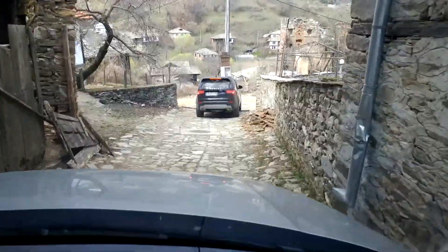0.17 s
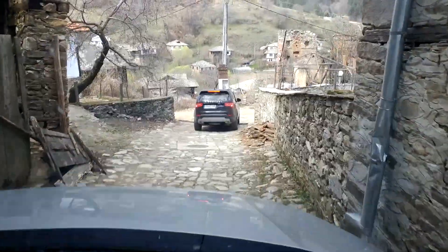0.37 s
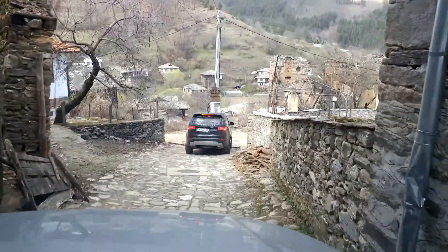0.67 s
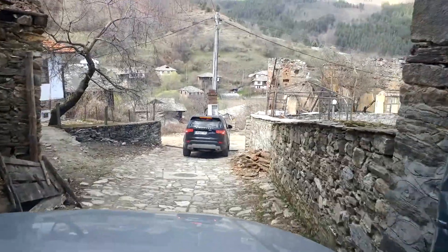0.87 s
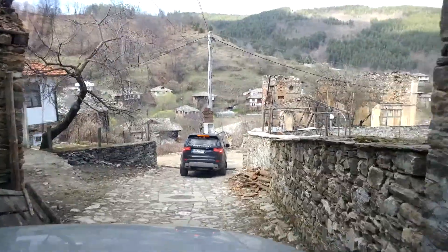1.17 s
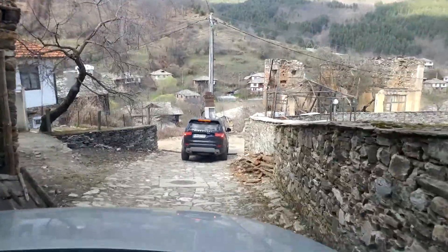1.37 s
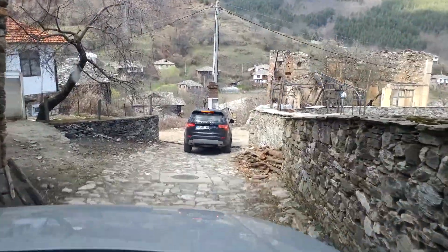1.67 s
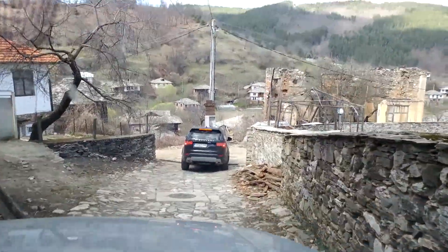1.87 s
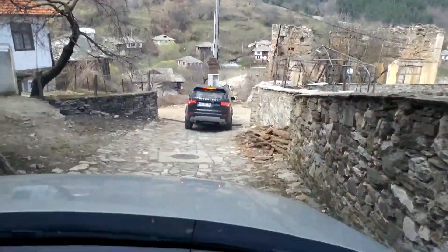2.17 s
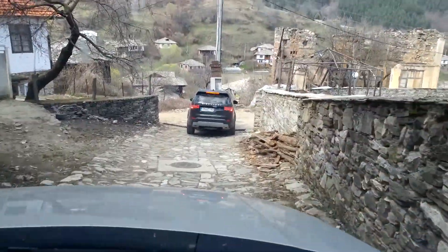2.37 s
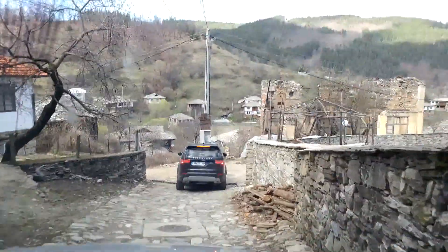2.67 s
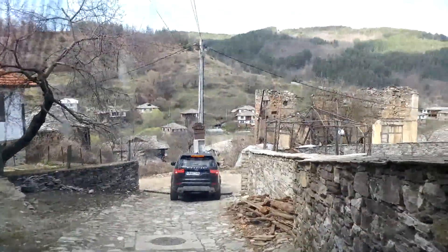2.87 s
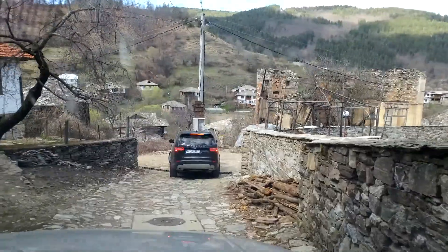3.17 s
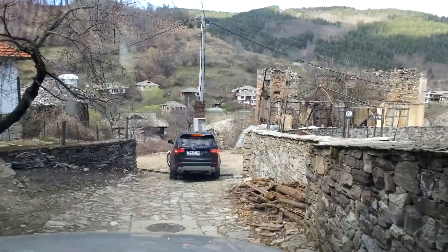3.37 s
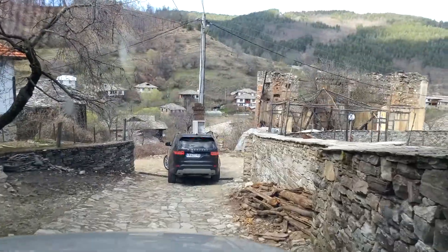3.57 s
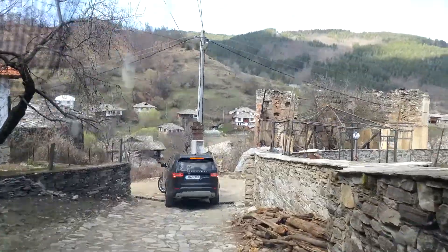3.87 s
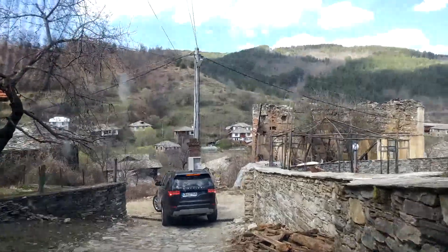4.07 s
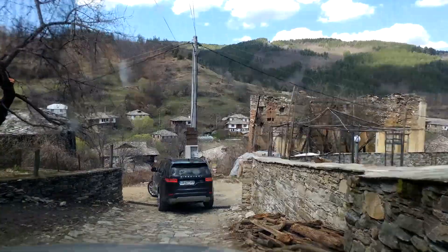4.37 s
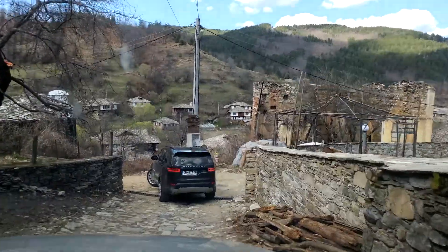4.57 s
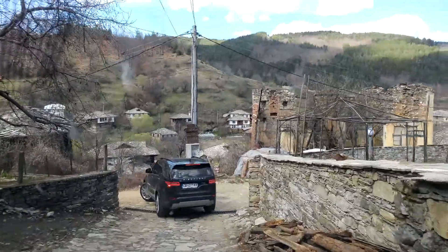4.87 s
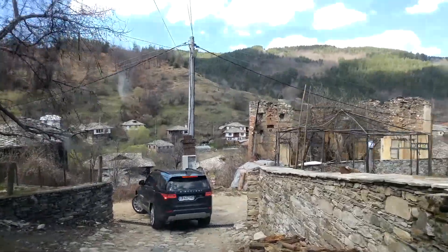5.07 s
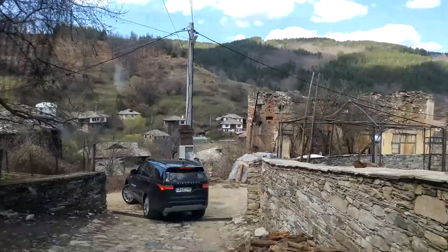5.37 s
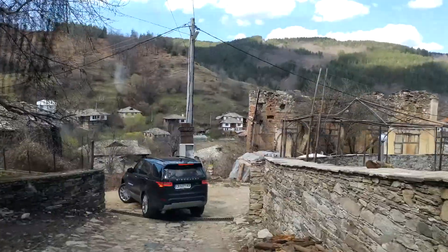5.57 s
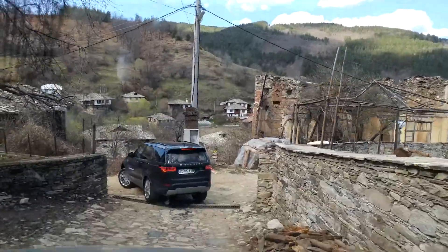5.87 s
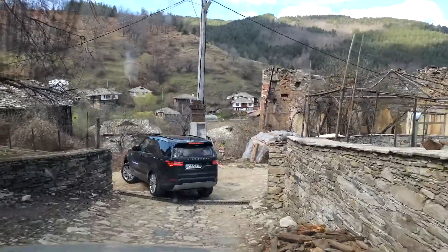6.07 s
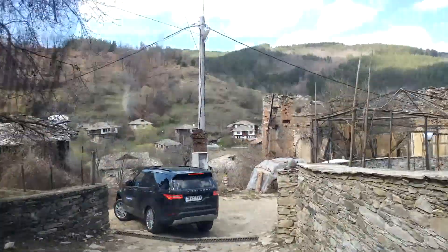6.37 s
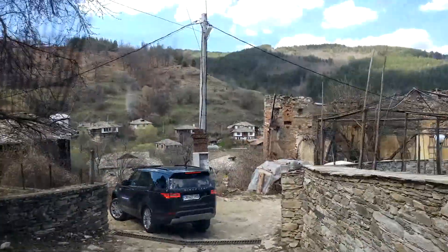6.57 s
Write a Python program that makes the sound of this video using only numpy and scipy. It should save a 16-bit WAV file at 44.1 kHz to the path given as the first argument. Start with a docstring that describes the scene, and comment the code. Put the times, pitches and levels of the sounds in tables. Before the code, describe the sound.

A car rolls slowly over cobblestones, heard from inside: low uneven rumble, steady engine hum and light clicks of plastic trim.

```python
"""A low, uneven booming fills the cabin of a car rolling slowly over cobblestones.
Stones strike the tyres and ring the cabin modes; hard ones knock through the suspension.
Under this run an engine hum and a blower roar. Plastic trim hisses, rattles and clicks,
and a brake squeaks faintly by stick-slip. Heard through a microphone pair near the windscreen."""
import sys
import numpy as np
from scipy import signal
from scipy.fft import rfft, irfft, next_fast_len
from scipy.io import wavfile
from scipy.ndimage import uniform_filter1d

SR = 44100
rng = np.random.default_rng(int(sys.argv[2]) if len(sys.argv) > 2 else 0)


def unload_audio(sound):
    """Save the sound as a 16-bit wav file, at the path given as the first command line argument."""
    columns = np.transpose(np.atleast_2d(sound))
    # keep every value between -1 and 1, then stretch to whole-number steps
    steps = np.round(np.clip(columns, -1, 1) * 32767)
    wavfile.write(sys.argv[1], SR, steps.astype(np.int16))


N = 296954

# Stereo likeness of cabin noise. Each row: frequency in Hz, left-right correlation.
COHERENCE = [(60, 0.46), (200, 1), (420, 0.85), (690, 0.49), (1130, 0.065), (3000, 0.06), (13000, 0.029)]
# Trim hiss. Each row: frequency in Hz, relative density in dB.
HISS_SPECTRUM = [(1200, 11), (2500, 4.5), (4500, 0.5), (6500, 0), (14000, 8)]
# Each row: time in seconds, hiss level in dB.
HISS_LEVEL = [(0.0, -54), (0.16, -66), (0.35, -68.5), (0.75, -64), (0.92, -67.5), (1.3, -62), (1.95, -65.5),
              (2.5, -66.5), (2.8, -64), (3.25, -66.5), (3.7, -70.5), (3.95, -64), (4.45, -68), (4.65, -64),
              (4.9, -67.5), (5.1, -62), (5.5, -68), (6.0, -65.5), (6.7, -62)]
# Engine hum. Each row: time in seconds, pitch in Hz, level in dB.
ENGINE_HUM = [(0.05, 161.4, -45), (1.0, 162.2, -46.5), (2.79, 168.5, -46.5), (3.22, 161.1, -45.5),
              (3.9, 166.7, -46.5), (4.33, 163.5, -45.5), (4.9, 167.9, -47.5), (6.4, 165.8, -44.5),
              (6.6, 161, -47.5)]
# Blower and engine roar. Each row: frequency in Hz, relative density in dB.
ROAR_SPECTRUM = [(90, -25.5), (130, -25.5), (200, -11), (260, -7), (380, -12), (560, -4.5), (800, -13.5),
                 (1000, -25.5), (1400, -32), (1900, -39), (2500, -51), (3200, -80)]
# Each row: time in seconds, base roar level in dB.
ROAR_LEVEL = [(0.02, -45), (0.72, -44), (0.92, -44.5), (2.3, -44.5), (4.54, -44.5), (4.6, -41.5),
              (4.7, -46), (5.1, -44), (5.3, -45.5), (6.5, -43.5), (6.72, -43.5)]
# Duct and panel resonances. Each row: frequency in Hz, width in Hz, level in dB.
DUCT_MODES = [(190, 14, -55), (530, 50, -56), (780, 40, -63), (1265, 19, -70.5), (1820, 17, -77)]
# Brake squeak, one list per note. Each row: time in seconds, pitch in Hz, level in dB.
BRAKE_NOTES = [
    [(1.288, 3760, -76), (1.325, 3620, -73), (1.378, 3700, -71), (1.42, 3860, -79), (1.57, 3780, -80),
     (1.615, 3750, -70), (1.66, 3830, -86), (1.84, 3760, -85)],
    [(1.685, 4350, -77), (1.74, 4560, -78), (1.83, 4530, -82), (1.885, 4430, -75), (1.92, 4450, -77),
     (1.965, 4350, -86)],
]
# Close ticks. Each row: start in seconds, gain in dB, left minus right in dB.
CLOSE_TICKS = [(2.352, -62, 3), (3.054, -61, -2), (3.095, -65, 0), (3.2, -64, 0), (5.32, -62, -6),
               (5.523, -61, -5), (5.625, -64, -2), (5.7173, -61, 9), (6.1066, -61, -9), (6.444, -57, -8)]
# Trim clicks. Each row: start in seconds, click length in seconds, knock gain in dB,
# snap gain in dB, snap slope in dB per octave, ring frequency in Hz, ring gain as a factor.
TRIM_CLICKS = [(0.032, 0.0098, -6.5, -34.5, -2, 4600, 1.4), (0.05, 0.1, -30, -55, 18, 10700, 2.7),
               (0.176, 0.062, -2.5, -45, -20, 2360, 0.61), (0.413, 0.021, -15, -39, 6, 2370, 11),
               (1.108, 0.05, -36, -37, 5, 7750, 0.84), (1.226, 0.019, -24, -41, -5, 6100, 2),
               (1.393, 0.015, -5, -37, -1, 1400, 2.1), (1.507, 0.023, -15, -42, -19, 1900, 3),
               (1.728, 0.032, -21, -29.5, 1.5, 3100, 1.4), (2.073, 0.019, -34, -40, -1, 6340, 2.2),
               (2.469, 0.087, -15, -39, 7, 6240, 1), (3.568, 0.02, -15, -36.5, -15, 3700, 3.4),
               (3.87, 0.023, -22, -35, 0, 5440, 7.8), (3.878, 0.025, -6, -29, -2, 2960, 9.8),
               (3.948, 0.065, -7.5, -39, 4.5, 7150, 2.6), (4.592, 0.031, -13, -34, 3, 3960, 1.2),
               (5.101, 0.032, -9, -40.5, 1, 3710, 3.6), (5.144, 0.035, -26, -39.5, 1.5, 10500, 2),
               (5.373, 0.024, -23, -39.5, 2, 5570, 4.6), (5.867, 0.014, -23, -38.5, 2, 6170, 5.1),
               (5.887, 0.047, -16, -39, -2, 6380, 3.3), (6.163, 0.022, -6, -30, 1.5, 4020, 3),
               (6.244, 0.013, -19, -46, -5, 4050, 3.75), (6.333, 0.056, -34, -33, -11, 3330, 1.26),
               (6.464, 0.031, -8, -30, 2, 5190, 2)]
# Hollow knock of the trim. Each row: frequency in Hz, gain in dB.
TRIM_BODY = [(600, -29), (1000, -2.5), (1400, -12.5), (2400, -26.5), (4000, -71)]
# Plastic trim modes. Each row: frequency in Hz, gain as a factor.
TRIM_MODES = [(1020, 2.43), (1400, 0.57), (2980, 0.42), (3640, 1.2), (4000, 1.67), (4700, 0.63),
              (5900, 2.1), (7400, 1.5)]
# Hard stones. Each row: start in seconds, gain in dB, ring frequency in Hz, T60 in seconds.
STONE_KNOCKS = [(0.72, -30.5, 513, 0.12), (2.495, -36.5, 328, 0.15), (2.709, -39, 448, 0.11),
                (4.051, -25.5, 138, 0.1), (4.595, -19.5, 179, 0.054), (4.749, -35, 567, 0.11),
                (5.899, -23.5, 143.3, 0.15), (6.444, -34, 563, 0.052)]
# Cabin and body modes, two groups. Each row: frequency in Hz, width in Hz, relative level in dB.
LOW_BOOM_MODES = [(40, 10, -2), (49, 12, 0), (63, 13, -1)]
HIGH_BOOM_MODES = [(80, 13, 1), (99, 14, 0), (116, 11, -11)]
# Run of cobbles. Each row: time in seconds, low boom in dB, high boom in dB.
COBBLE_LEVELS = [(0, -46.5, -40), (1.1, -37.5, -62.5), (1.7, -35.5, -34.5), (2.2, -36.5, -39.5),
                 (3.1, -39.5, -43), (3.6, -32, -41), (4.35, -53, -39.5), (4.8, -33.5, -37.5),
                 (5.6, -31, -34), (6.15, -40.5, -41.5), (6.4, -31.5, -34), (6.73, -30.5, -51)]
# Larger stones and dips. Each row: centre in seconds, half-length in seconds,
# low boom in dB, high boom in dB.
ROAD_BUMPS = [(0.01, 0.056, -27.5, -33.5), (0.176, 0.1, -62, -31.5), (0.471, 0.53, -35.5, -39),
              (0.62, 0.16, -28.5, -49), (0.741, 0.22, -41, -29.5), (0.959, 0.084, -34, -30.5),
              (1.224, 0.19, -33.5, -36), (1.383, 0.1, -37.5, -35.5), (2.441, 0.026, -55, -27.5),
              (2.636, 0.18, -28, -30), (2.978, 0.15, -28, -29), (3.276, 0.26, -32, -38.5),
              (3.762, 0.13, -50, -33.5), (3.947, 0.27, -29.5, -43), (4.033, 0.077, -39, -29),
              (4.282, 0.14, -35, -37.5), (4.51, 0.11, -30.5, -54), (4.615, 0.074, -28.5, -23),
              (4.736, 0.16, -26.5, -31.5), (4.915, 0.037, -45, -23), (5.06, 0.22, -31, -33.5),
              (5.125, 0.064, -40, -28.5), (5.915, 0.18, -35, -33), (6.05, 0.11, -29.5, -48),
              (6.278, 0.14, -30.5, -35), (6.483, 0.04, -28, -27), (6.598, 0.13, -41, -29.5)]
# Capsule response. Each row: frequency in Hz, gain in dB.
MIC_RESPONSE = [(20, -19.5), (36, 0.5), (7000, 1), (8300, -5), (9100, -13), (9700, -0.5), (10500, -3),
                (12000, -10.5), (14000, -15.5)]
# Microphone port imbalance. Each row: frequency in Hz, left minus right in dB.
PORT_BALANCE = [(60, 0), (180, -3), (310, 0.5), (500, -1.5), (4000, -1.5), (7500, -2), (9000, 6),
                (10000, 13.5), (11500, 5), (13500, 1.5)]
# One small pop: start in seconds, height in dB, left minus right in dB.
POP = (4.321, -39.5, 10.5)

PORT_LAG_S, BAND_LIMIT_HZ = .00014, 13550
STONES_PER_S, RATTLES_PER_S, CLICK_GRAINS_PER_S = 150, 25, 4000


def gain_of(db):
    return 10 ** (np.asarray(db) / 20)


def panned_gain(db, pan_db):
    return gain_of(db + np.array([[.5], [-.5]]) * pan_db)


def unit_rms(x):
    return x / np.sqrt(np.mean(x ** 2) + 1e-20)


def level_out(x):
    """Holds the slow level near RMS 1; keeps the quick grain."""
    slow_power = uniform_filter1d((x ** 2).mean(0), size=5000)
    return unit_rms(x / np.sqrt(slow_power + 0.021 * np.mean(x ** 2)))


def at_hz(table, hz):
    """Spectrum table, interpolated over log frequency."""
    table_hz, value = np.transpose(table)
    return np.interp(np.log(hz + 1), np.log(table_hz + 1), value)


def curves(table):
    """Columns of a time table, per sample."""
    times_s, *columns = np.transpose(table)
    return [np.interp(np.arange(N) / SR, times_s, column) for column in columns]


def resonate(x, hz, *widths_hz):
    """One unity-gain resonance per width, in series: shift to 0 Hz, smooth, shift back."""
    carrier = np.exp(2j * np.pi * np.cumsum(hz * np.ones(x.shape[-1])) / SR)
    for width_hz in widths_hz:
        pole = np.exp(-np.pi * width_hz / SR)
        x = 2 * (carrier * signal.lfilter([1 - pole], [1, -pole], x * carrier.conj())).real
    return x


def stereo(x, y, correlation):
    """Left is x; right blends x with y."""
    return np.array([x, correlation * x + np.sqrt(1 - correlation ** 2) * y])


def centre_between_ports(x):
    """Delays the right channel so squeaks and clicks reach both ports together."""
    return np.array([x[0], np.roll(x[1], round(PORT_LAG_S * SR))])


def cabin_noise(spectrum, patch_db, flicker_db, fft_size):
    """Stereo noise at RMS 1 with drifting spectral patches and a broadband flicker."""
    hop, hz = fft_size // 4, np.fft.rfftfreq(fft_size, 1 / SR)
    re_x, im_x, re_y, im_y, jitter = rng.standard_normal((N // hop + 5, len(hz), 5)).T
    flicker = unit_rms(uniform_filter1d(jitter[0], size=3))
    patches = unit_rms(uniform_filter1d(uniform_filter1d(jitter, size=9, axis=0), size=9, axis=1))
    bins = stereo(re_x + 1j * im_x, re_y + 1j * im_y, at_hz(COHERENCE, hz)[:, None])
    bins *= gain_of(at_hz(spectrum, hz)[:, None] + patch_db * patches + flicker_db * flicker)
    return unit_rms(signal.istft(bins, nperseg=fft_size, noverlap=fft_size - hop)[1][:, :N])


def trim_hiss():
    """Rubbing trim: treble noise that swells and fades."""
    level_db, = curves(HISS_LEVEL)
    return gain_of(level_db) * cabin_noise(HISS_SPECTRUM, patch_db=1.5, flicker_db=1.0, fft_size=512)


def trim_rattle():
    """Loose trim makes many faint contacts, a few larger."""
    chance, size, side = rng.random((3, N))
    taps = (chance < RATTLES_PER_S / SR) * gain_of(-4.0 * np.log(size + .06))
    taps = np.array([taps * side, taps * (1 - side)])
    t = np.arange(600) / SR
    grain = np.diff(rng.standard_normal((2, len(t) + 1))) * np.exp(-t / 0.0064)
    return gain_of(-74.0) * resonate(signal.oaconvolve(taps, grain, axes=1)[:, :N], 5000, 5000)


def brake_squeaks():
    """Pad and disc stick and slip: a thin, wavering whistle with some rasp."""
    out = np.zeros((2, N))
    for note in BRAKE_NOTES:
        start, end = round(note[0][0] * SR), round(note[-1][0] * SR)
        length = end - start
        hz, db = (curve[start:end] for curve in curves(note))
        waver, grip = (unit_rms(uniform_filter1d(x, size=500)) for x in rng.standard_normal((2, length)))
        tone = np.sqrt(2) * np.sin(2 * np.pi * np.cumsum(hz + 35 * waver) / SR) * gain_of(3.5 * grip)
        rasp = unit_rms(resonate(rng.standard_normal((2, length)), hz, 150, 300))
        out[:, start:end] += gain_of(db) * (.6 * tone + .8 * rasp) * signal.windows.tukey(length, .03)
    return centre_between_ports(out)


def close_ticks():
    """Dry, bright snaps near the microphones, a few milliseconds each."""
    out, t = np.zeros((2, N + SR)), np.arange(300) / SR
    for start_s, db, pan_db in CLOSE_TICKS:
        snap = resonate(rng.standard_normal((2, len(t))), 6400, 7200) * np.exp(-t / 0.003)
        start = round(start_s * SR)
        out[:, start:start + len(t)] += panned_gain(db, pan_db) * snap
    return out[:, :N]


def pop():
    """The signal jumps once and relaxes within milliseconds."""
    start_s, db, pan_db = POP
    t = np.arange(N) / SR - start_s
    return -panned_gain(db, pan_db) * (t >= 0) * np.exp(-abs(t) / 0.0024)


def engine_and_blower():
    """One engine order hums under a broad roar with wandering duct and panel resonances."""
    hum_hz, hum_db = curves(ENGINE_HUM)
    hum = np.sqrt(2) * gain_of(hum_db) * np.sin(2 * np.pi * np.cumsum(hum_hz) / SR)
    air = cabin_noise([(50, 0), (2500, 0), (4000, -40)], patch_db=4, flicker_db=.3, fft_size=2048)
    drift = 1 + .012 * unit_rms(uniform_filter1d(rng.standard_normal(N), size=12000))
    ducts = sum(gain_of(db) * unit_rms(resonate(air, hz * drift, width_hz, 3 * width_hz))
                for hz, width_hz, db in DUCT_MODES)
    roar_db, = curves(ROAR_LEVEL)
    _, shake_db = boom_levels_db()
    roar_db += 0.05 * (shake_db - shake_db.mean())  # rough stones shake the body more
    roar = cabin_noise(ROAR_SPECTRUM + [(6000, -110)], patch_db=1.5, flicker_db=.8, fft_size=1024)
    return hum + gain_of(roar_db) * roar + gain_of(roar_db - roar_db.mean()) * ducts


def trim_clicks():
    """A short noisy click with a brief ring of the trim modes; the cabin adds a short tail."""
    out, t = np.zeros((2, N + SR)), np.arange(8192) / SR
    hz = np.fft.rfftfreq(len(t), 1 / SR)
    for start_s, click_s, knock_db, snap_db, db_per_octave, ring_hz, ring_gain in TRIM_CLICKS:
        noise, tail = rng.standard_normal((2, 2, len(t)))
        grains = rng.random(len(t)) < CLICK_GRAINS_PER_S / SR
        click = centre_between_ports(stereo(*noise, .5) * grains * np.exp(-(t / click_s) ** 3))
        tail *= gain_of(-26.0 - 60 * t / .05)
        tail[:, 0] = 1  # direct sound
        burst = rfft(click) * rfft(tail)
        burst /= np.sqrt(np.mean(abs(burst) ** 2))
        octaves = np.log2(np.maximum(hz, 2400) / 4000)
        snap = gain_of(snap_db + db_per_octave * octaves) * np.minimum(hz / 2000, 1) ** 2
        knock = gain_of(knock_db + at_hz(TRIM_BODY, hz))
        ring = ring_gain / (1 + 1j * (hz - ring_hz) / 120)
        drives = rng.uniform(.3, 1.5, len(TRIM_MODES))  # each blow lands elsewhere
        modes = sum(drive * gain / (1 + 1j * (hz - mode_hz) / 60)
                    for drive, (mode_hz, gain) in zip(drives, TRIM_MODES))
        start = round(start_s * SR)
        out[:, start:start + len(t)] += irfft(burst * (snap + knock) * (1 + modes + ring)) * (t < .12)
    return out[:, :N]


def suspension_knocks():
    """Each hard stone excites a damped swing with a weaker overtone."""
    out, t = np.zeros(N + SR), np.arange(SR // 4) / SR
    attack = 1 - np.exp(-t / 0.0023)
    for start_s, db, hz, t60_s in STONE_KNOCKS:
        swing = np.sin(2 * np.pi * hz * t) + 0.29 * np.sin(2 * np.pi * 1.4 * hz * t)
        start = round(start_s * SR)
        out[start:start + len(t)] += gain_of(db - 60 * t / t60_s) * attack * swing
    return out[:N]


def boom_levels_db():
    """Low and high boom levels: each bump adds a smooth swell to the run of cobbles."""
    t, power = np.arange(N) / SR, gain_of(curves(COBBLE_LEVELS)) ** 2
    for centre_s, half_s, low_db, high_db in ROAD_BUMPS:
        near = abs(t - centre_s) < half_s
        swell = np.cos(np.pi / 2 * (t[near] - centre_s) / half_s) ** 4
        power[:, near] += gain_of([[low_db], [high_db]]) ** 2 * swell
    return 10 * np.log10(power)


def cobble_boom():
    """Uneven stones strike the tyres at random, ringing the cabin modes and the floor pan."""
    chance, height, polarity = rng.random((N, 3)).T
    blows = (chance < STONES_PER_S / SR) * gain_of(-3.0 * np.log(height + 1e-3)) * np.sign(polarity - .5)
    blows = stereo(blows, np.roll(blows, SR), 0.99)
    low_db, high_db = boom_levels_db()
    out = np.zeros((2, N))
    for level_db, modes in ((low_db, LOW_BOOM_MODES), (high_db, HIGH_BOOM_MODES)):
        rings = sum(gain_of(db) * unit_rms(resonate(blows, hz, width_hz, 1.35 * width_hz))
                    for hz, width_hz, db in modes)
        out += gain_of(level_db) * level_out(rings)
    floor_pan = level_out(resonate(resonate(blows, 310, 200), 300, 280))
    return out + gain_of(0.71 * high_db - 35.5) * floor_pan


def scene():
    return (cobble_boom() + suspension_knocks() + engine_and_blower() + trim_hiss()
            + trim_rattle() + trim_clicks() + close_ticks() + brake_squeaks())


def record(dry):
    """Capsule colour, port imbalance and delay, one pop, then the band limit."""
    padded = np.pad(dry, [(0, 0), (0, 2048)], "reflect", reflect_type="odd")
    size = next_fast_len(N + 8192)
    hz = np.fft.rfftfreq(size, 1 / SR)
    left_port = gain_of(.5 * at_hz(PORT_BALANCE, hz)) * np.exp(-1j * np.pi * hz * PORT_LAG_S)
    response = gain_of(at_hz(MIC_RESPONSE, hz)) * np.array([left_port, 1 / left_port])
    picked_up = irfft(rfft(padded, size) * response, size)
    picked_up[:, :N] += pop()
    lowpass = signal.firwin(511, BAND_LIMIT_HZ, window=("kaiser", 9), fs=SR)
    return signal.oaconvolve(picked_up, lowpass[None], "same")[:, :N]


dry = scene()
out = record(dry)
unload_audio(out)
```